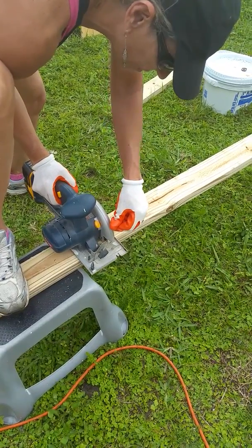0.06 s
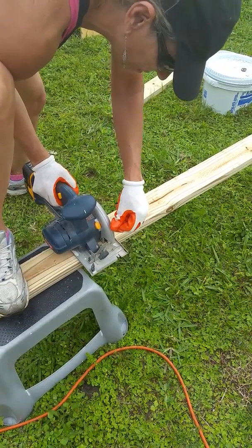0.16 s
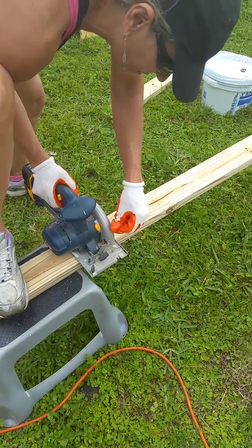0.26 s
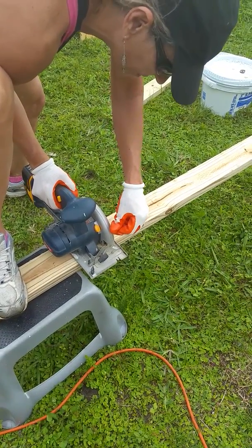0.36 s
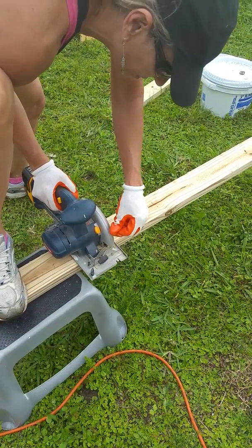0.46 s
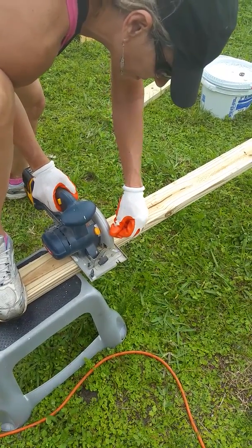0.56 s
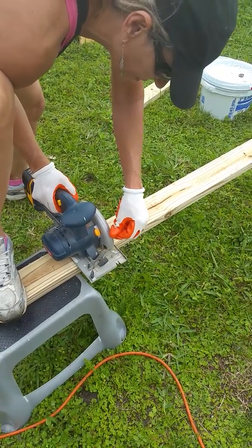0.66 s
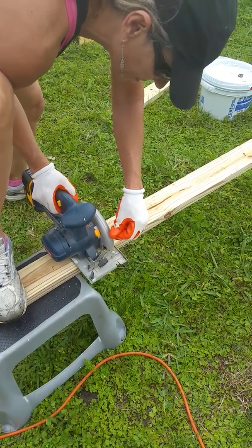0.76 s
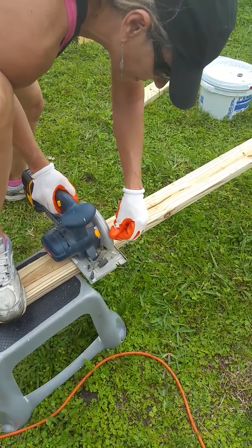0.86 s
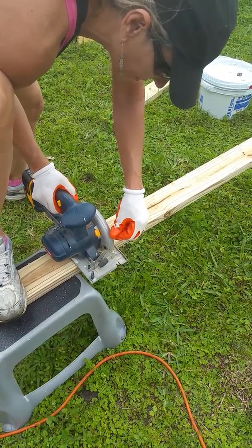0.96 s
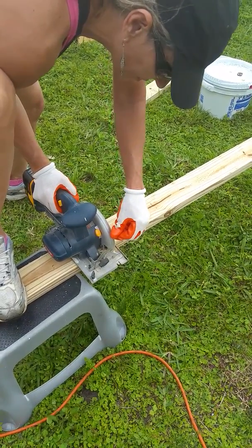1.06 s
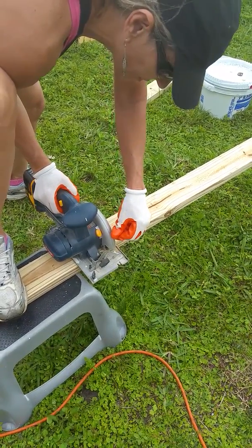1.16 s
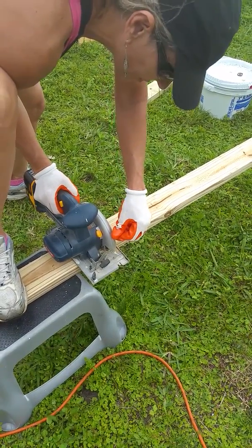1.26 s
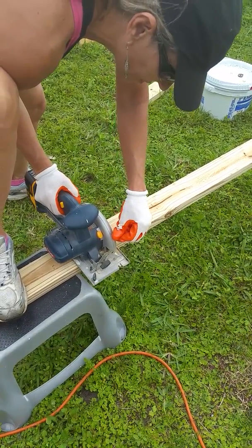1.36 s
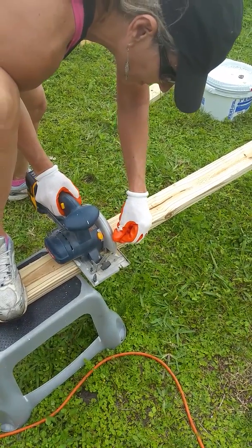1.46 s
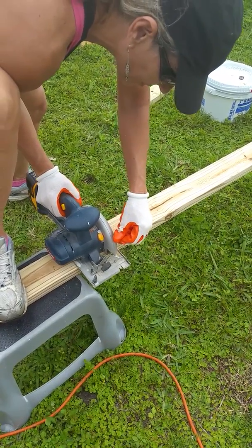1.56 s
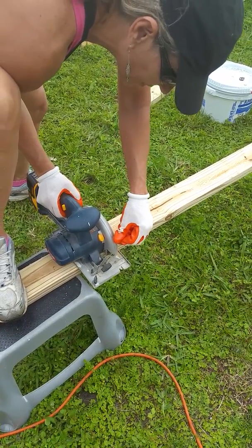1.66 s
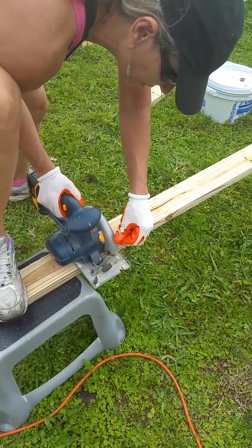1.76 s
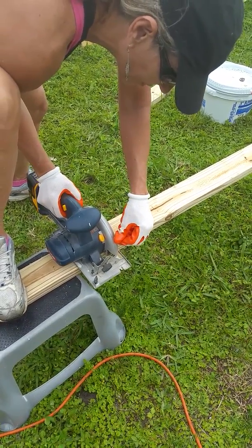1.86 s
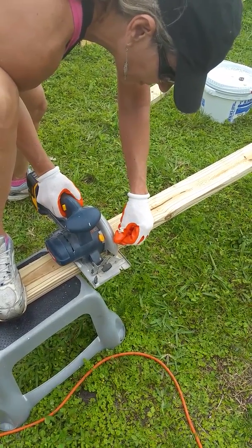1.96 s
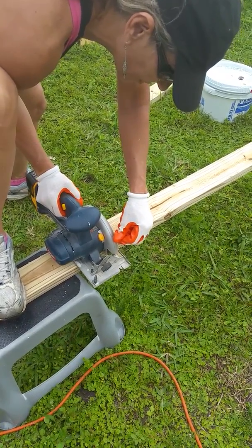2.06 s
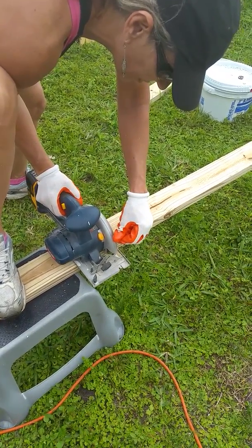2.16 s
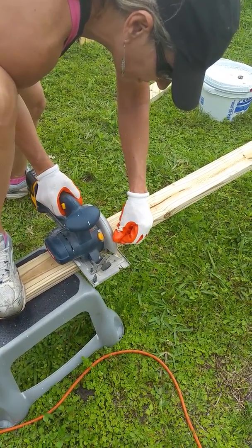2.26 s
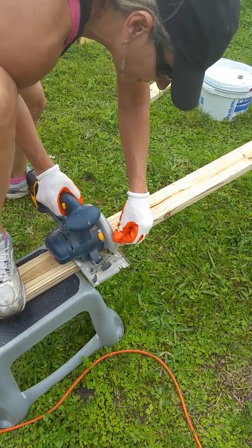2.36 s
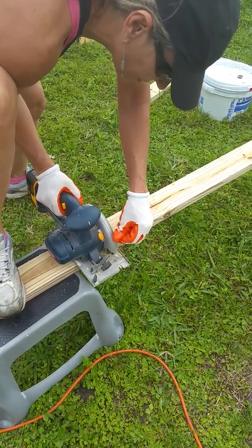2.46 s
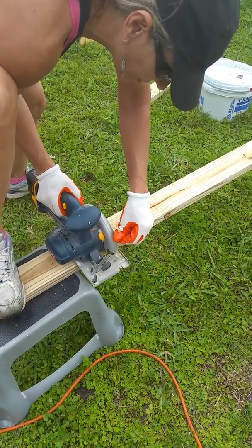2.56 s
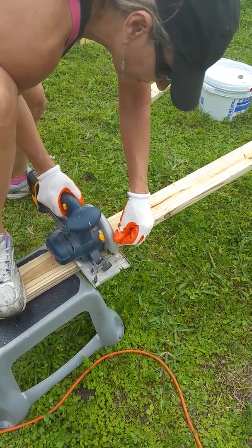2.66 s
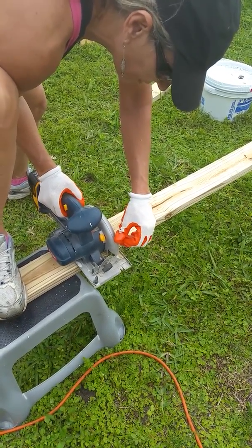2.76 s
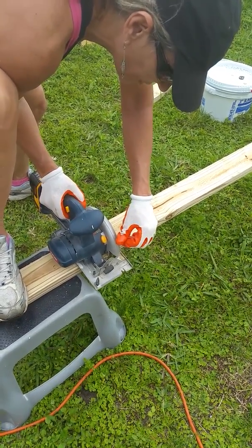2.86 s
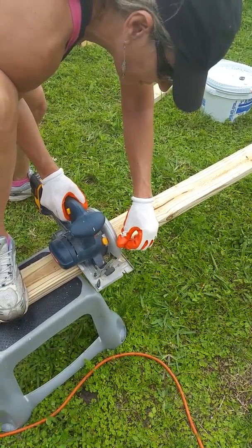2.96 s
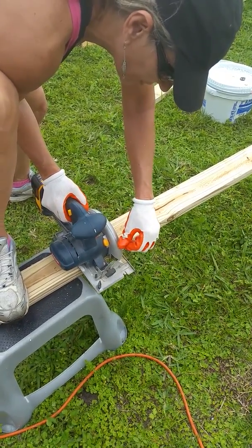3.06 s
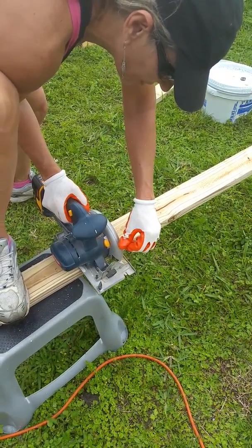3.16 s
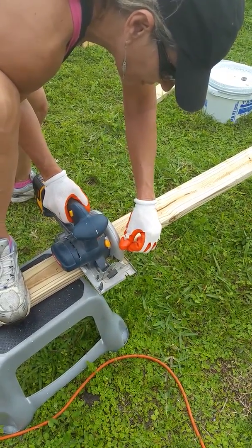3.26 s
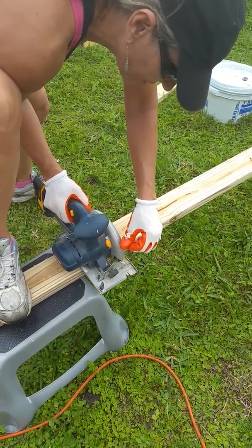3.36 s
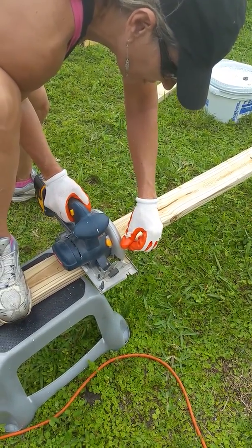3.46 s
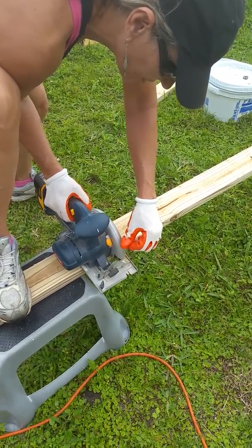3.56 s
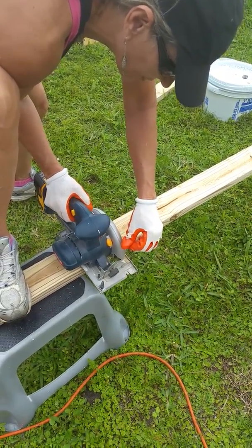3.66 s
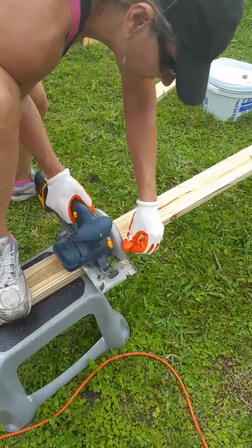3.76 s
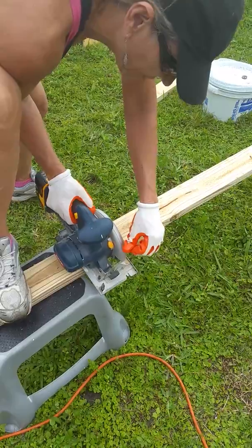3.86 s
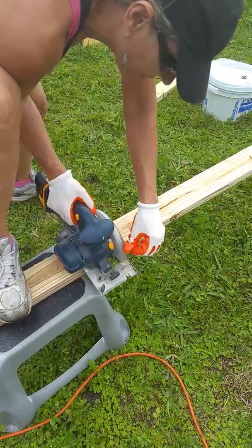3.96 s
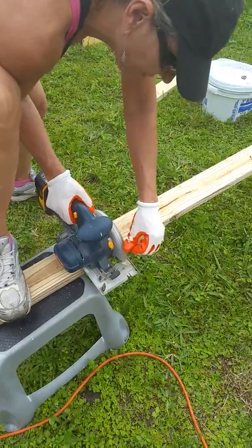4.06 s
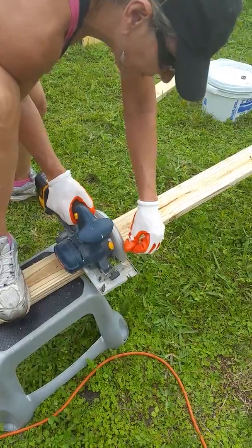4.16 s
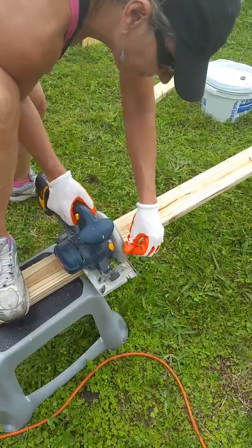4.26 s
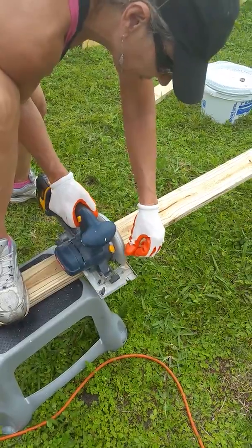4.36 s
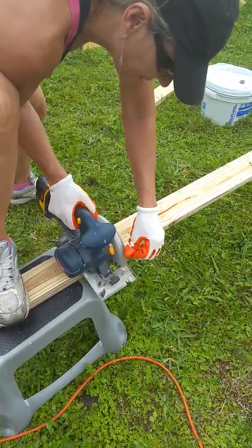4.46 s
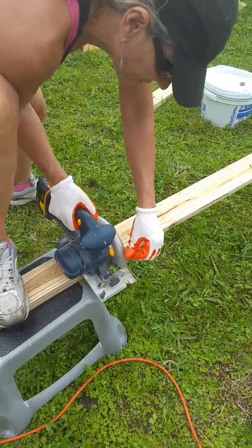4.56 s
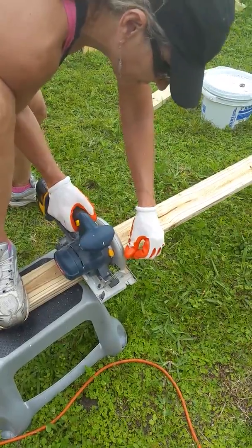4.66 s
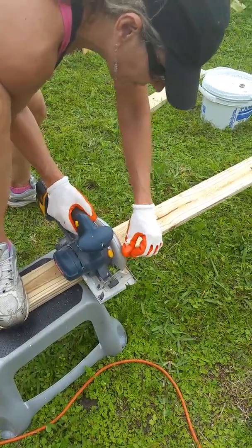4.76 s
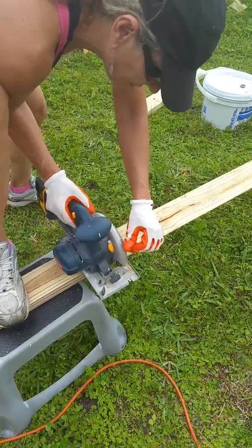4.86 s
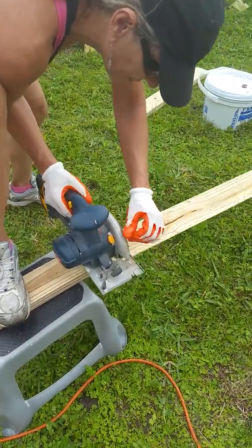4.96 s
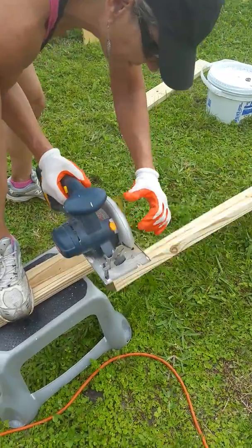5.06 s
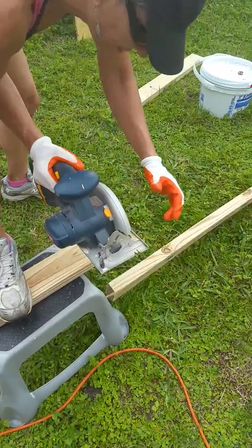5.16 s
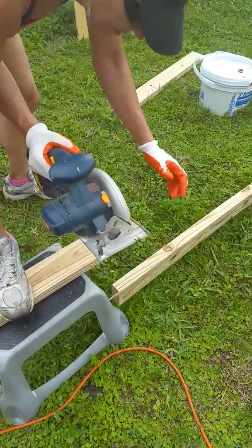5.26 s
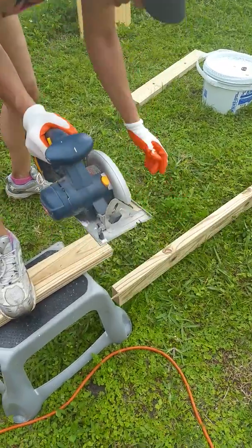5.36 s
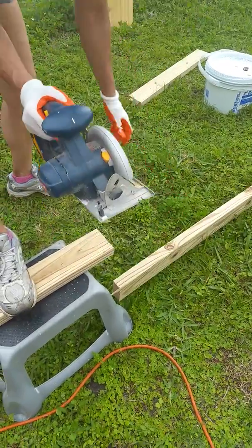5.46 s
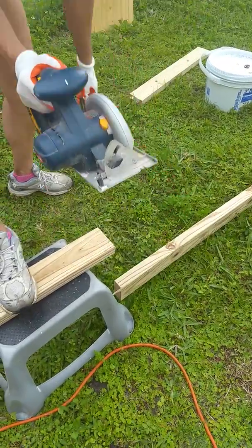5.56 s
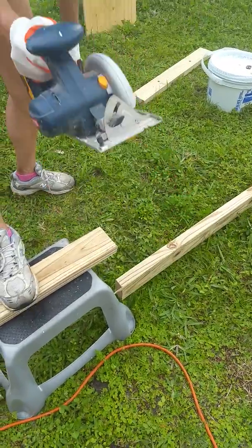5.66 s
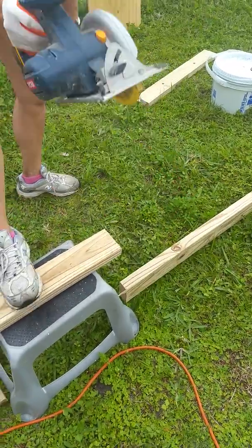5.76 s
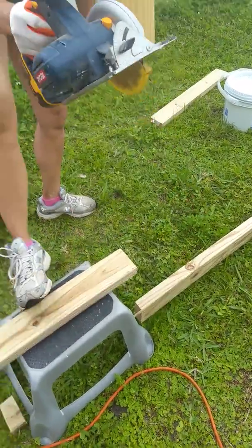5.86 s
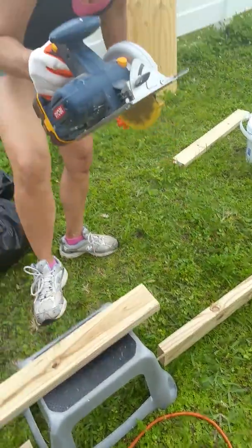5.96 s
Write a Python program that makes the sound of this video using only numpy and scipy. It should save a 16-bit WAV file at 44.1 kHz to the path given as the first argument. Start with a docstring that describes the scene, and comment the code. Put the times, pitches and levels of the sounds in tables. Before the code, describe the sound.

Harsh, hissing saw cut through a plank with rising gear whine, quick spin-down, then a sharp wooden clack and small bounces in a yard.

```python
"""Circular saw crosscutting in a yard

A battery saw with an 18-tooth blade crosscuts a board, to the right of a phone's stereo microphone.
One cutting force drives board, steel and housing; sines make the gear whine and tooth tones as the saw bogs down.
The brake stops it, the offcut cracks loose and drops on the grass, the guard snaps shut: noise bursts through
wood resonances, echoed by ground and fence. Hum, rumble, far yard noise and a soft treble noise lie underneath."""
import sys
import numpy as np
from scipy import signal
from scipy.fft import rfft, irfft, next_fast_len
from scipy.io import wavfile
from scipy.ndimage import uniform_filter1d, map_coordinates

SR = 44100
rng = np.random.default_rng(int(sys.argv[2]) if len(sys.argv) > 2 else 0)


def unload_audio(sound):
    """Save the sound as a 16-bit wav file, at the path given as the first command line argument."""
    columns = np.transpose(np.atleast_2d(sound))
    # keep every value between -1 and 1, then stretch to whole-number steps
    steps = np.round(np.clip(columns, -1, 1) * 32767)
    wavfile.write(sys.argv[1], SR, steps.astype(np.int16))


N = 265482  # length in samples

TEETH, GEAR, PINION = 18, 42, 6  # blade teeth, gear wheel teeth, motor pinion teeth
BRAKE_S = 4.345  # trigger let go
# under the brake each layer loses so many dB for each dB of speed lost
BOARD_SLOWING, HISS_SLOWING, MESH_SLOWING, TOOTH_SLOWING = 1.54, 2.76, 1.23, 2.75


def amp(db):
    """Gain of a level in dB."""
    return 10 ** (np.asarray(db) / 20)


def unit(x):
    """x at rms 1."""
    return x / np.sqrt(np.mean(x ** 2) + 1e-20)


def along(points, hz):
    """Values at hz from (Hz, value) points joined on a log axis."""
    f, v = np.transpose(points)
    return np.interp(np.log(hz + 1), np.log(f + 1), v)


def curves(rows):
    """One value per sample for each column after the time."""
    s, *cols = np.transpose(rows)
    return [np.interp(np.arange(N) / SR, s, c) for c in cols]


def wobble(rate, size=N):
    """A smooth random curve, rate knots a second."""
    knots = rng.standard_normal(int(size * rate / SR) + 4)
    return map_coordinates(knots, [np.arange(size) * rate / SR])


def filtered(x, response):
    """x with its spectrum multiplied by a response of frequency."""
    m = next_fast_len(x.shape[-1] + 8192)
    spectrum = rfft(x, m) * response(np.fft.rfftfreq(m, 1 / SR))
    return irfft(spectrum, m)[..., :x.shape[-1]]


def modes(rows):
    """Causal response of (Hz, width Hz, dB) resonances, alternating in sign."""
    def response(f):
        total = 0
        for k, (centre, width, db) in enumerate(rows):
            damping = 1j * f * width
            total = total + (-1) ** k * amp(db) * damping / (centre * centre - f * f + damping)
        return total
    return response


def spread(pair, alike):
    """Two unrelated signals mixed to left and right of a given likeness."""
    def mix(hz):
        turn = np.arccos(np.clip(along(alike, hz), -1, 1)) / 2
        return np.sqrt(2) * np.array([np.cos(turn), np.sin(turn)])
    mid, side = filtered(pair, mix)
    return np.array([mid + side, mid - side]) / np.sqrt(2)


def moving_peak(x, centre_hz, width_hz, skirt_db):
    """A resonance whose centre and width move in time, over a flat skirt above 1000 Hz."""
    hz, t, z = signal.stft(x, SR, nperseg=1024)
    frames = np.minimum((t * SR).astype(int), N - 1)
    offset = (hz[:, None] - centre_hz[frames]) / width_hz[frames]
    gain = 1 / (1 + (2 * offset) ** 2) + amp(skirt_db) * (hz[:, None] > 1000)
    return signal.istft(z * gain, SR, nperseg=1024)[1][..., :N]


def patchy(x, patchy_db):
    """Random patches of gain in time and frequency."""
    z = signal.stft(x, nperseg=1024)[2]
    field = uniform_filter1d(rng.standard_normal(z.shape[1:]), size=10, axis=0)
    field = uniform_filter1d(field, size=14, axis=1)
    return signal.istft(z * amp(patchy_db * unit(field)), nperseg=1024)[1][:, :N]


def rotor():
    """Blade speed in turns per s, how hard the saw labours (0-1), and the speed lost under the brake in dB."""
    # Blade speed under power, before smoothing. Each row: time in seconds, turns per second.
    power_speed = [(0.0, 60.3), (0.18, 56.7), (0.277, 56.3), (0.532, 57.5), (0.973, 54.1), (1.095, 52.2),
                   (1.31, 50.4), (1.42, 48.1), (1.6, 47.8), (2.2, 51.9), (2.39, 51), (2.536, 47.7),
                   (2.739, 45.9), (2.936, 45.4), (3.04, 42.2), (3.13, 41.7), (3.22, 34.8), (3.3, 30.8),
                   (3.402, 32.3), (3.55, 37.3), (3.64, 38.3), (3.78, 32.7), (3.87, 30.2), (4.139, 36.3),
                   (4.211, 32.7), (4.335, 36.1)]
    lag_s, crawl = .097, 7.1  # brake time constant; turns per s that the braked speed tends to
    labour_from, labour_full = 53, 39  # turns per s at which the saw starts to labour and labours fully
    powered, = curves(power_speed)
    braked_s = np.clip(np.arange(N) / SR - BRAKE_S, 0, None)
    speed = crawl + (powered - crawl) * np.exp(-braked_s / lag_s)
    # the rotor's inertia rounds every bend
    speed = uniform_filter1d(speed, size=SR // 20)
    labour = np.clip((labour_from - speed) / (labour_from - labour_full), 0, 1)
    lost_db = 20 * np.log10(speed / uniform_filter1d(powered, size=SR // 20))
    # braked and slow, it judders
    judder = .06 * wobble(14) * np.clip(1 - speed / 24, 0, 1) ** .5
    return speed * (1 + judder), labour, lost_db


def once_a_turn(turns, tightness):
    """Gain of rms 1 that swells once a turn; the tighter, the shorter the swell."""
    return np.exp(tightness * np.cos(2 * np.pi * turns)) / np.sqrt(np.i0(2 * tightness))


def bite(turns, labour):
    """Cutting force: each turn the same teeth meet the wood much as before, plus fresh chip noise."""
    memory_turns, count = 13.92, 512  # turns between fresh rim patterns; points round the rim
    share = np.clip(.74 + (.21 - .74) * labour, 0, 1)  # share of power alike from turn to turn
    runout = .062 + (.29 - .062) * labour
    drift = turns / memory_turns
    rim = rng.standard_normal((2, int(drift[-1]) + 4, count))
    place = [drift, turns % 1 * count]
    again = np.array([unit(map_coordinates(r, place, mode="grid-wrap")) for r in rim])
    # scaled to the density of the rim noise at 50 turns per s
    fresh = rng.standard_normal((2, N)) * np.sqrt(SR / count / 50)
    # a blade that runs out of true bites hardest once a turn
    swing = once_a_turn(turns, runout)
    return swing, swing * (np.sqrt(share) * again + np.sqrt(1 - share) * fresh)


def board_ring(force, width_hz, board_db):
    """The cutting force rings one wandering resonance of the board."""
    centre_hz = 1682 + 30 * wobble(8)
    ring = unit(moving_peak(force, centre_hz, width_hz, skirt_db=-30.5))
    # a narrower resonance rings louder
    return ring * np.sqrt(400 / width_hz) * amp(board_db + 0.75 * wobble(25.03))


def blade_hiss(force, swing, hiss_db):
    """Teeth and flying chips excite the blade's steel modes over a broad hiss."""
    # Steel modes of the blade. Each row: frequency in Hz, width in Hz, level in dB.
    steel_modes = [(2447, 64, -9.5), (4775, 860, -4), (6503, 68, 6.5), (7320, 69, -5), (9640, 120, -1.5),
                   (10380, 240, -7.5), (12120, 890, -9), (12330, 180, -4.5), (13200, 160, -7.5),
                   (14780, 320, -9.5)]
    # Relative spectrum of the hiss. Each row: frequency in Hz, density in dB per Hz.
    hiss_curve = [(1120, -35), (1900, -7), (2310, -7.5), (2960, -4), (3820, -9.5), (4720, -6.5),
                  (5940, -23), (6490, -5), (8310, -7), (11900, 0.5), (15000, -15.5), (15700, -13.5)]

    def steel(hz):
        return amp(along(hiss_curve, hz)) + amp(1.5) * np.abs(modes(steel_modes)(hz)) * (hz > 2000)

    chips = rng.standard_normal((2, N)) * amp(0.25 * wobble(30.04) + 1.1 * wobble(400))
    # the low steel follows the teeth turn by turn, the high hiss is mostly flying chips
    low = filtered(force / swing ** 0.64, lambda hz: 1 / np.hypot(1, (hz / 5500) ** 2))
    high = filtered(chips, lambda hz: 1 / np.hypot(1, 5500 / (hz + 1)))
    hiss = unit(patchy(filtered(low + high, steel), patchy_db=2.0))
    return hiss * amp(hiss_db + 0.63 * wobble(10))


def housing_rattle(force, swing, speed, lost_db):
    """The force, evened out over each turn, rattles the housing: louder the faster the blade turns."""
    # Relative spectrum of the housing. Each row: frequency in Hz, density in dB per Hz.
    housing_curve = [(59, -49.5), (100, -20.5), (256, -29), (344, 11), (420, -13.5), (612, -21), (900, -1),
                     (1100, 15.5), (1250, -14.5), (1400, -6), (1820, -47), (3080, -120)]
    rattle = unit(filtered(force / swing, lambda hz: amp(along(housing_curve, hz))))
    speed_db = 0.68 * np.clip(speed - 48, -12, None)  # dB per turn per s
    return rattle * amp(-47.0 + BOARD_SLOWING * lost_db + speed_db + 0.82 * wobble(5.1))


def gears(turns, speed, labour, mesh_db):
    """The gear mesh with motor-shaft sidebands and its overtones, coloured by the gear case."""
    # Colour of the gear case. Each row: frequency in Hz, gain in dB.
    case_curve = [(250, -9), (600, -7), (1000, -10.5), (1300, -9), (1600, 4.5), (1900, -8.5), (2300, -6),
                  (4000, 17.5), (5000, -14), (8000, -31.5)]
    since_s = np.clip(np.arange(N) / SR - BRAKE_S, 0, None)
    # the brake loads the gears backwards: their overtones flare by up to 30 dB and fade at 48 dB per s
    overtone_db = -42.5 + (-54.5 + 42.5) * labour
    overtone_db = overtone_db + 30 * np.clip(since_s / .06, 0, 1) ** 2 - 48 * since_s
    mesh = turns * GEAR + .06 * wobble(80)
    parts = [(1, mesh_db), (1 - 1 / PINION, mesh_db - 11), (1 + 1 / PINION, mesh_db - 17), (2, overtone_db)]
    for k in range(3, 7):
        # the upper overtones sink by 40 dB between 1900 and 2400 Hz
        parts.append((k, overtone_db + 1.5 - 40 * np.clip(k * GEAR * speed / 500 - 3.8, 0, 1)))
    # slow gears rattle: each tone breaks up
    unsteady_db = 2.5 + 2.5 * np.clip(2 - speed / 15, 0, 1)
    whine = 0
    for k, db in parts:
        level = amp(db + along(case_curve, k * GEAR * speed) + unsteady_db * wobble(40))
        whine = whine + level * np.sqrt(2) * np.sin(2 * np.pi * k * mesh)
    return whine


def tooth_tones(turns, speed, tooth_db, lost_db):
    """A slightly rough tone at the tooth rate, with one neighbour above and one below."""
    # the upper neighbour fades as the blade slows below 57 turns per s
    upper_db = np.maximum(-37 + 3.7 * np.minimum(speed - 57, 0), -53.5) + 2 * lost_db
    rough = turns + .003 * wobble(50)
    tones = 0
    for k, db in [(0, tooth_db), (1, upper_db), (-0.87, tooth_db - 14.5)]:
        tones = tones + amp(db + 1.6 * wobble(25)) * np.sqrt(2) * np.sin(2 * np.pi * (TEETH + k) * rough)
    return tones


def proud_teeth(turns, board_db, throb, tight):
    """The proudest teeth strike in one burst a turn: a tone at twice the tooth rate."""
    strike = amp(board_db + 1.6 * wobble(25)) * np.sqrt(2 * throb) * once_a_turn(turns, tight)
    return strike * np.sin(2 * np.pi * 2 * TEETH * turns)


def saw():
    """Teeth drive the board, the blade's steel and the housing; gears and teeth add their tones."""
    # The cut before the brake's losses. Each row: time in seconds, board level in dB, blade hiss in dB,
    # gear mesh in dB, tooth tone in dB, width of the board resonance in Hz.
    cut = [(0, -22.5, -18, -31.5, -44, 400), (.3, -22, -17, -30, -39.5, 356),
           (.6, -20.5, -21, -34, -42, 182), (.95, -24, -16.5, -26, -43, 443),
           (1.12, -21.5, -18, -25, -34, 452), (1.35, -26, -16.5, -42, -37.5, 400),
           (1.5, -22.5, -18.5, -47, -43, 220), (2, -22, -18.5, -52, -46.5, 350),
           (2.25, -19.5, -17, -45, -47.5, 307), (2.5, -21.5, -19.5, -35, -41.5, 201),
           (2.85, -24.5, -21, -36, -46, 201), (3.08, -23.5, -21.5, -21, -55, 392),
           (3.17, -24, -22, -26.5, -55, 398), (3.33, -26, -21, -19, -49.5, 400),
           (3.52, -21.5, -19, -22, -44.5, 394), (3.75, -23, -21.5, -23.5, -49.5, 380),
           (4, -24.5, -18.5, -19.5, -40, 380), (4.17, -21.5, -20, -24, -42.5, 400),
           (4.24, -29, -20, -18, -49, 400), (4.34, -19, -17, -23.5, -32, 393)]
    # Twice the tooth rate rings in the board. Each row: time in seconds, share of the board's power (0-1),
    # how tightly it bunches into one burst a turn.
    throbbing = [(1.65, 0, 2.5), (1.82, .4, 2.5), (1.97, .15, 2.5), (2.19, .75, 2.6), (2.4, .75, 2.6),
                 (2.5, .3, .8), (2.6, .55, .25), (2.85, .45, .25), (3, 0, .25)]
    # Likeness of left and right. Each row: frequency in Hz, correlation.
    saw_alike = [(100, .6), (300, 0.38), (800, 0.2), (1700, 0.91), (3000, 0.88), (6000, 0.364),
                 (10000, 0.71), (15000, 0.55)]
    # Level across the stereo microphone. Each row: frequency in Hz, left minus right in dB.
    level_tilt = [(60, -1.5), (99, -3.5), (160, -7), (270, 3.5), (450, -12), (740, 10), (1220, -8),
                  (2010, -1.5), (3330, -3), (5500, -8), (9080, -5), (15000, -14)]
    # Phase across the stereo microphone. Each row: frequency in Hz, radians by which left leads.
    phase_lead = [(0, 0.5), (600, -1.06), (1030, -0.95), (1720, 1.12), (2410, -1), (4050, -1.07),
                  (4740, 1.5), (5600, 1), (6370, -3), (7670, -1.06), (8700, -2), (11800, -2), (14600, -17),
                  (16400, -6)]
    stop_s = 4.765  # standstill
    t = np.arange(N) / SR
    speed, labour, lost_db = rotor()
    turns = np.cumsum(speed) / SR + 1 / 3
    board_db, hiss_db, mesh_db, tooth_db, width_hz = curves(cut)
    throb, tight = curves(throbbing)
    # the slowing teeth catch unevenly
    chatter_db = 2.5 * wobble(45) * np.clip(-lost_db / 6, 0, 1)
    board_db = board_db + BOARD_SLOWING * lost_db + chatter_db
    hiss_db = hiss_db + HISS_SLOWING * lost_db + chatter_db
    mesh_db = mesh_db + MESH_SLOWING * lost_db + chatter_db
    tooth_db = tooth_db + TOOTH_SLOWING * lost_db + chatter_db
    swing, force = bite(turns, labour)
    noise = np.sqrt(1 - throb) * board_ring(force, width_hz, board_db)
    noise = noise + blade_hiss(force, swing, hiss_db) + housing_rattle(force, swing, speed, lost_db)
    teeth = tooth_tones(turns, speed, tooth_db, lost_db) + proud_teeth(turns, board_db, throb, tight)
    shaft = amp(board_db - 40.5 + 2.6 * wobble(26)) * np.sin(2 * np.pi * GEAR / PINION * turns)
    whole = spread(noise, saw_alike) + gears(turns, speed, labour, mesh_db) + teeth + shaft
    whole = whole * amp(-60 * np.clip(t - stop_s, 0, None) / 0.043)
    side = np.array([[1], [-1]])

    def placed(hz):
        # the saw stands to the right: level and phase differ across the microphone, band by band
        lead = np.interp(hz, *np.transpose(phase_lead))
        return amp(side * along(level_tilt, hz) / 2) * np.exp(.5j * side * lead)

    return filtered(whole, placed)


def yard():
    """A low hum, rumble, far smooth noise, and treble noise: extra saw hiss, then grass and cloth rustle."""
    # Rumble. Each row: time in seconds, level in dB.
    rumble_levels = [(0.0, -56), (1.16, -70), (1.59, -55), (1.9, -70.5), (2.5, -59), (3.9, -68), (4.6, -59),
                     (5.37, -49), (5.73, -51.5), (6.02, -46)]
    # Yard noise; the first row also holds through the cut. Each row: time in seconds, far noise in dB,
    # treble noise in dB: the saw's extra hiss until it stops, then grass and cloth rustle.
    yard_levels = [(4.72, -44.5, -44.5), (4.79, -48, -59), (4.94, -52, -62), (5.17, -47.5, -69.5),
                   (5.28, -48, -54), (5.39, -45, -48), (5.56, -45, -59), (6.02, -45, -61.5)]
    # Relative spectra of rumble, far noise and treble noise. Each row: frequency in Hz, density in dB per Hz.
    rumble_curve = [(12, -46), (20, -15), (32, -23), (57, -21.5), (75, -3.5), (129, -2), (162, -6),
                    (203, -8.5), (260, -22), (340, -52.5), (570, -120)]
    far_curve = [(120, -14), (200, -14.5), (234, -10.5), (266, -4.5), (444, -3.5), (542, -4), (573, 0.5),
                 (1690, -9.5), (6000, -49.5), (7800, -73.5), (13200, -120)]
    treble_curve = [(1500, -27), (2500, 6), (4000, 0), (6500, -4), (9000, -13), (12500, -5.5), (15700, -22)]
    # Likeness of left and right. Each row: frequency in Hz, correlation.
    yard_alike = [(60, 0.84), (240, 0.99), (950, 0.07), (4000, .1)]

    def coloured(curve):
        return unit(filtered(rng.standard_normal((2, N)), lambda hz: amp(along(curve, hz))))

    rumble_db, = curves(rumble_levels)
    far_db, treble_db = curves(yard_levels)
    hum_turns = np.cumsum(75 + 1.74 * wobble(14.0)) / SR  # wanders about 75 Hz
    hum = amp(rumble_db - 1.5 + 1.2 * wobble(12)) * np.sqrt(2) * np.sin(2 * np.pi * hum_turns)
    rumble = amp(rumble_db + 3 * wobble(11)) * coloured(rumble_curve)
    far = amp(far_db + 3.4 * wobble(2.9)) * coloured(far_curve)
    treble = amp(treble_db + 2.0 * wobble(60)) * coloured(treble_curve)
    return hum + spread(rumble + far + treble, yard_alike)


def thud():
    """Low pushes whose pitch drops at once to 90 Hz."""
    # Dull bumps, one near the phone, one as the offcut meets the ground.
    # Each row: start in seconds, level in dB, time to fall 60 dB in seconds.
    bumps = [(2.319, -16, .02), (5.21, -32, .09)]
    out = 0
    for s, db, t60 in bumps:
        t = np.clip(np.arange(N) / SR - s, 0, None)
        cycles = 90 * t + 0.77 * (1 - np.exp(-t / 0.00045))
        out = out + amp(db - 60 * t / t60) * np.sin(2 * np.pi * cycles)
    return out


def knocks():
    """Brake click, splinters, the offcut landing and bouncing, the guard: bursts into wood, with a steel ring."""
    # Blows. Each row: start in seconds, level in dB, treble in dB over the wood's peak,
    # time for the burst to fall 60 dB in seconds.
    blows = [(4.752, -35, 0, 0.034), (4.824, -50.5, 4, 0.049), (4.842, -57.5, -18, 0.054),
             (5.104, -24.5, -16.5, 0.06), (5.118, -28, 4, 0.023), (5.19, -30, -5, 0.14),
             (5.214, -28.5, -5, 0.13), (5.235, -13, -2, 0.13), (5.238, -10.5, -16.5, 0.13),
             (5.262, -14, -3, 0.092), (5.31, -20.5, -4.5, 0.076), (5.328, -20, -9, 0.053),
             (5.409, -19, -22.5, 0.047), (5.468, -31.5, -12, 0.088), (5.533, -28.5, -20, 0.084),
             (5.814, -50, -8, 0.053), (5.821, -51, 6, 0.055)]
    # Resonances of the offcut. Each row: frequency in Hz, width in Hz, level in dB.
    wood_modes = [(250, 760, -19), (696, 390, -2), (1067, 180, 9), (1700, 320, 10), (2530, 470, -0.5),
                  (3870, 320, -2.5)]
    # Relative spectrum of the treble. Each row: frequency in Hz, density in dB per Hz.
    crack_curve = [(1760, -32), (3000, -3.5), (3650, -8.5), (4170, -6.5), (8340, -11.5), (12600, -12),
                   (16000, -15.5)]
    # Steel guard modes. Each row: frequency in Hz, relative level in dB, time to fall 60 dB in seconds.
    guard_modes = [(2510, 6, 1.3), (3420, -6, .9)]
    pan_db, ring_db = -2, -40.5  # left minus right; the steel under each blow
    out, t = np.zeros((2, N + SR)), np.arange(SR // 2) / SR
    for s, db, treble_db, t60 in blows:
        burst = rng.standard_normal((3, len(t))) * amp(-60 * t / t60)
        burst = burst[0] + .5 * burst[1:]  # one shared part, one part of each side's own
        wood = filtered(burst * (1 - np.exp(-t / 0.0004)), modes(wood_modes))
        # splinters and grass follow the blow: a slower rise
        crack = filtered(burst * (1 - np.exp(-t / 0.0044)), lambda hz: amp(along(crack_curve, hz)))
        ring = 0
        for hz, mode_db, mode_t60 in guard_modes:
            level = amp(mode_db - 60 * t / mode_t60 + 4 * wobble(45, size=len(t)))
            ring = ring + level * np.sin(2 * np.pi * hz * t)
        sound = wood / np.abs(wood).max() + amp(treble_db) * crack / np.abs(crack).max() + amp(ring_db) * ring
        start = round(s * SR)
        out[:, start:start + len(t)] += amp(db + pan_db * np.array([[.5], [-.5]])) * sound
    return out[:, :N]


def fence(x):
    """Short scattered echoes from ground and fence: a dulled noise tail that falls 60 dB in 0.41 s."""
    t = np.arange(SR // 3) / SR
    tail = filtered(rng.standard_normal((2, len(t))) * amp(-60 * t / 0.41), lambda hz: 1 / (1 + hz / 2500))
    return signal.fftconvolve(x, tail / np.linalg.norm(tail[0]), axes=1)[:, :N]


def scene():
    """Saw, yard, bumps and blows together; only the blows have echoes."""
    hits = knocks()
    return saw() + yard() + thud() + hits + amp(-8.0) * fence(hits)


def record(dry):
    """The phone rounds off the highest peaks and keeps nothing above its band limit."""
    top_hz = 15780
    rounded = dry / (1 + np.abs(dry) ** 6) ** (1 / 6)
    return filtered(rounded, lambda hz: hz < top_hz)


dry = scene()
out = record(dry)
unload_audio(out)
```